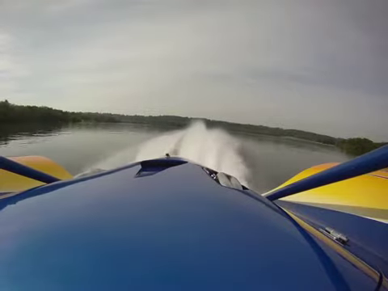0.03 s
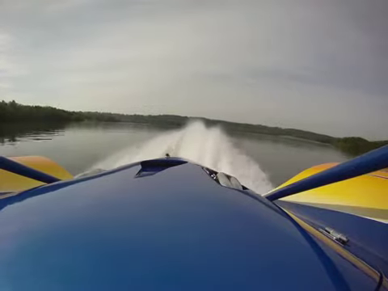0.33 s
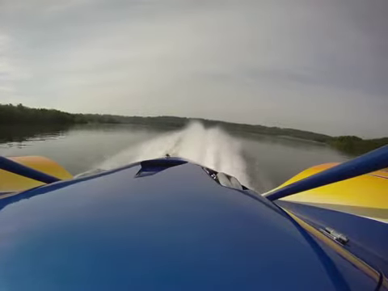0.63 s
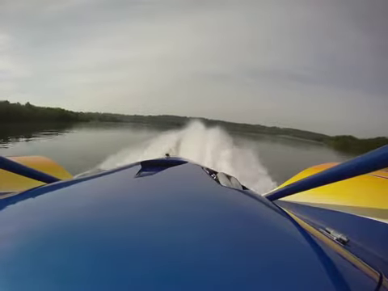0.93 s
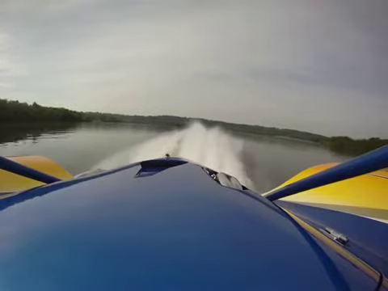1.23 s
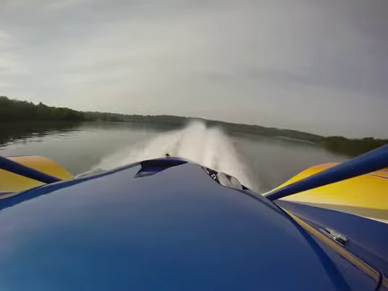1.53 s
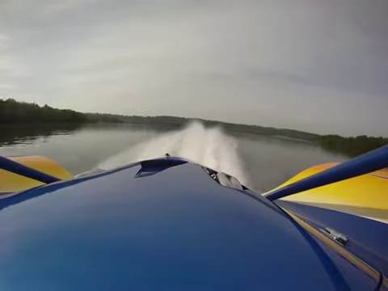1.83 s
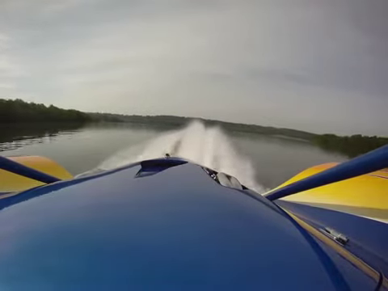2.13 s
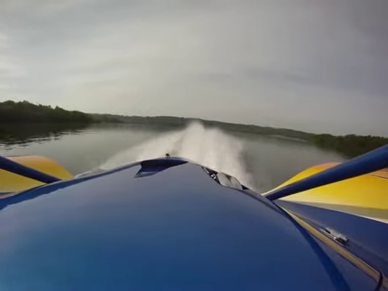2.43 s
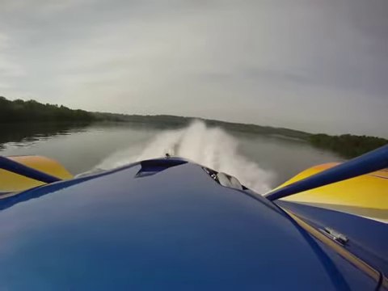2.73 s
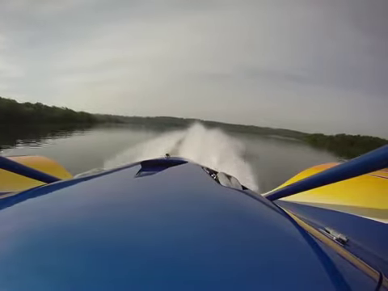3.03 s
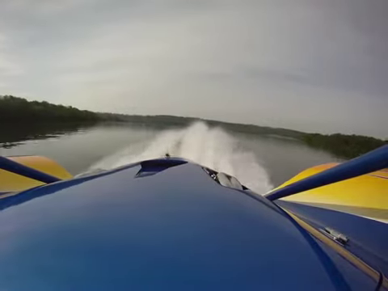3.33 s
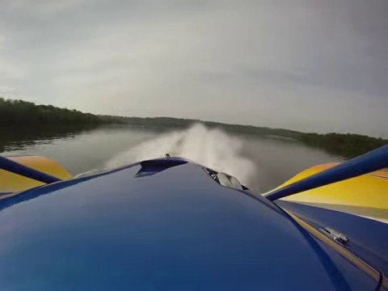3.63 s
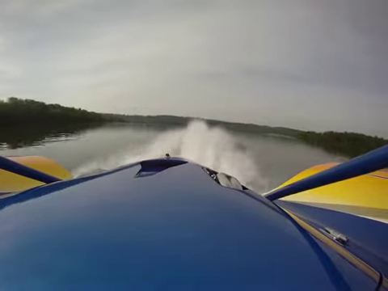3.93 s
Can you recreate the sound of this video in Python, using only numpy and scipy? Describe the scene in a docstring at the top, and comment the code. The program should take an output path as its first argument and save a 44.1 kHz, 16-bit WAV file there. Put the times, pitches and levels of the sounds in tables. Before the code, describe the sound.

A speedboat engine roars flat out for all four seconds, heard from the deck. Its booming, raspy exhaust throbs against the propeller's drone, with a thin fizz on top and brief, irregular cracks. The wake rumbles underneath while the pitch creeps slightly upward. Around 2.5 seconds the engine's tone shifts a little, and low wind gusts swell at about 2.7, 3.5 and 4 seconds.

```python
"""A speedboat runs flat out on calm water, heard from its own deck.
From the start the V8's exhaust booms, rasps and now and then cracks, over a rumble of wake and wind.
The geared four-blade propeller drones just under the engine cycle's sixth order, so the two beat,
and coarse sampling adds a fizz on top. The speed creeps up; near 2.5 s the engine's colour shifts,
and from then to the end the wind swells in three gusts."""
import sys
import numpy as np
from scipy import signal
from scipy.fft import rfft, irfft
from scipy.io import wavfile
from scipy.ndimage import uniform_filter1d

SR = 44100
rng = np.random.default_rng(int(sys.argv[2]) if len(sys.argv) > 2 else 0)


def transcribe(signal):
    """Save signal, clipped to [-1, 1], as a 16-bit WAV file at the path in sys.argv[1]."""
    frames = np.atleast_2d(signal).T
    limited = np.clip(frames, -1, 1)
    pcm = np.round(limited * 32767).astype(np.int16)
    wavfile.write(sys.argv[1], SR, pcm)


N = 176400
T = np.arange(N) / SR

# Spectrum of the wind: frequency_hz, relative_db
WIND_SPECTRUM = [(12, -28), (22, -9), (35, 0), (48, -6), (70, -11), (140, -26), (400, -55), (1500, -90)]
# Gusts of the wind: time_s, level_db
WIND_LEVEL = [(0, -42), (1.1, -39.5), (2.4, -40), (2.72, -33), (3.0, -40), (3.3, -40), (3.45, -33),
              (3.6, -40), (3.85, -38), (4, -34)]
# Spectrum of the wake and hull: frequency_hz, relative_db
WAKE_SPECTRUM = [(25, -34), (60, -21.5), (95, -21), (130, -11.5), (170, -8.5), (210, -2.5), (240, -7),
                 (290, -3), (350, -14.5), (430, -17), (520, -33), (900, -56.5), (2500, -91.5)]
# Exhaust cracks: start_s, relative_db
CRACK_EVENTS = [(0.1461, -12), (0.5851, -16), (0.6589, -15), (0.7801, -15), (0.9014, -20), (1.1583, -14),
                (1.6746, -16), (1.8198, -18), (2.5581, -15), (2.9302, -15), (2.9632, -15), (3.5788, -12),
                (3.6027, -12), (3.7249, -14)]
# Spectrum of a crack: frequency_hz, relative_db
CRACK_SPECTRUM = [(400, -21.5), (700, -13), (1080, 11.5), (1400, -24), (1800, 6.5), (2200, 4), (2480, -2.5),
                  (2620, -28), (2750, -16.5), (3050, -30.5), (3800, -25), (4400, -41), (5600, -31),
                  (6500, -71.5)]
# High harmonics of the engine cycle, either side of the colour shift: order, before_db, after_db
WHINE_ORDERS = [(14, -51, -52), (15, -60, -47), (17, -39, -49), (18, -46, -41), (19, -47, -46),
                (21, -45, -50), (22, -51, -45), (23, -44, -51), (24, -45, -41), (25, -44, -34),
                (26, -43, -40), (27, -44, -48), (28, -49, -38), (31, -48, -53), (33, -52, -55),
                (41, -54, -42), (43, -44, -51), (46, -41, -45), (50, -49, -39), (51, -49, -39),
                (52, -45, -50), (53, -38, -45), (56, -44, -50), (66, -49, -57)]
# Each cylinder's burst, in firing order: relative_db
CYLINDER_BURSTS = [-0.5, 5.5, -2.7, -3.5, -16, -1, -3, 0.4]
# Spectrum of the exhaust gas noise: frequency_hz, relative_db
RASP_SPECTRUM = [(300, -8.5), (450, -12.5), (540, -14), (660, -9), (740, -4), (850, -4.5), (1080, 1.5),
                 (1200, 0), (1300, -10.5), (1420, -10), (1630, -6.5), (1760, -3.5), (2020, -3), (2170, 1.5),
                 (2460, -3), (2540, -11.5), (2610, -28), (2720, -5), (2830, -14), (3000, -21), (3250, -19),
                 (3480, -26.5), (3740, -17.5), (3920, -24), (4020, -21.5), (4300, -33.5), (5100, -31.5),
                 (5600, -36.5), (6000, -42.5), (7000, -57.5)]
# Course of the rasp's level: time_s, level_db
RASP_ENVELOPE = [(0, -32), (.7, -30), (1.4, -31.5), (1.7, -29), (2.2, -32.5), (2.6, -29), (3.1, -30.5),
                 (3.6, -30.5), (4, -29.5)]
# Harmonics of the propeller shaft's rotation: order, level_db
SHAFT_ORDERS = [(1, -40), (2, -40.5), (3, -26.5), (4, -16)]
# Low harmonics of the engine cycle, either side of the colour shift: order, before_db, after_db
BOOM_ORDERS = [(1, -60, -56.5), (2, -30, -29), (3, -41, -41), (4, -37, -36), (5, -20, -22.5),
               (6, -18.5, -20), (7, -31, -25), (8, -27.5, -25), (9, -33, -43), (10, -37.5, -34.5),
               (11, -51, -56.5), (12, -53, -55.5)]
# Engine speed, at two crank turns a cycle: time_s, cycle_rate_hz
ENGINE_SPEED = [(0.0, 40.573), (0.25, 41.013), (0.5, 40.769), (0.75, 41.378), (1.0, 41.229), (1.25, 41.188),
                (1.5, 41.613), (1.75, 41.493), (2.0, 41.911), (2.25, 41.761), (2.5, 42.042), (2.75, 42.335),
                (3.0, 41.836), (3.25, 42.661), (3.5, 42.022), (3.75, 42.539), (4.0, 42.794)]


def from_db(db):
    """Amplitude grows tenfold for every 20 dB."""
    return 10 ** (np.asarray(db) / 20)


def unit_rms(x):
    """Division by the root mean square gives unit power."""
    return x / np.sqrt(np.mean(x ** 2) + 1e-20)


def in_time(rows):
    """Linear interpolation gives a control value at every sample."""
    return np.interp(T, *np.transpose(rows))


def drift(corner_hz):
    """Low-pass filtered noise is a slow random fluctuation, here of unit rms."""
    hz = np.arange(N + 1) * SR / (2 * N)
    noise_spectrum = rfft(rng.standard_normal(2 * N))
    return unit_rms(irfft(noise_spectrum / (1 + (hz / corner_hz) ** 2))[:N])


def minimum_phase(db):
    """Causality: a body rings only once struck; the Hilbert transform of log gain sets its phase."""
    log_gain = np.r_[db, db[-2:0:-1]] * np.log(10) / 20
    return np.exp(np.conj(signal.hilbert(log_gain)))[:len(db)]


def colour(x, spectrum):
    """Linear filtering multiplies a sound's spectrum by a body's response; white noise keeps its power."""
    hz, db = np.transpose(spectrum)
    grid_hz = np.arange(N + 1) * SR / (2 * N)
    response = minimum_phase(np.interp(np.log(grid_hz + 1), np.log(hz), db))
    response /= np.sqrt(np.mean(abs(response) ** 2))
    return irfft(rfft(x, 2 * N) * response)[:N]


def colour_shift(before_db, after_db, centre_s=2.54, length_s=.25):
    """Timbre follows the balance of harmonics: one order's level ramps to a new value."""
    progress = np.clip((T - centre_s) / length_s + .5, 0, 1)
    return before_db + progress * (after_db - before_db)


def wind():
    """Turbulent pressure makes a low buffeting that swells in gusts."""
    return colour(rng.standard_normal(N), WIND_SPECTRUM) * from_db(in_time(WIND_LEVEL))


def wake(level_db=-27, waver_db=.3):
    """Churned water is a broadband source, filtered to a rumble by the hull."""
    return colour(rng.standard_normal(N), WAKE_SPECTRUM) * from_db(level_db - waver_db * drift(21))


def exhaust_cracks(decay_s=.002, spit_db=-2.5, snap_db=9.5):
    """Impulse excitation: a snap and a short spit of gas set the exhaust's resonances ringing."""
    gas = rng.choice([-1, 1], N)
    bursts = np.zeros(N)
    for start_s, db in CRACK_EVENTS:
        envelope = (T >= start_s) * np.exp(-abs(T - start_s) / decay_s)
        bursts += from_db(db + spit_db) * gas * envelope
        bursts[int(start_s * SR)] += from_db(db + snap_db)
    return colour(bursts, CRACK_SPECTRUM)


def engine_whine(cycles, waver_db=2, wander_cycles=.001):
    """High harmonics of the engine cycle stand out as tones, each wavering in level."""
    wandering = cycles + wander_cycles * drift(2.2)
    whine = np.zeros(N)
    for order, before_db, after_db in WHINE_ORDERS:
        gain = from_db(colour_shift(before_db, after_db) + waver_db * drift(1.33))
        whine += gain * np.sin(2 * np.pi * (order * wandering + rng.random()))
    return whine


def firing_envelope(cycles, lag=.34, jitter=.12, decay=.45, scatter_db=1):
    """Each cylinder's burst decays exponentially; lag, jitter and decay are in firing intervals."""
    cylinders = len(CYLINDER_BURSTS)
    firings = cycles * cylinders
    index = np.arange(-cylinders, int(firings[-1]) + cylinders)
    early_or_late, weakening = rng.standard_normal((len(index), 2)).T
    starts = np.sort(index + lag + jitter * early_or_late)
    strength = from_db(np.array(CYLINDER_BURSTS)[index % cylinders] - scatter_db * weakening)
    latest = np.searchsorted(starts, firings) - 1
    return strength[latest] * np.exp(-(firings - starts[latest]) / decay)


def exhaust_rasp(cycles, steady_flow=.64, repeating_share=.42, waver_db=.9):
    """Amplitude modulation: the firings pulse gas noise that partly repeats from cycle to cycle."""
    flow = firing_envelope(cycles) + steady_flow
    orders = np.exp(2j * np.pi * rng.random(size=513))
    orders[[order for order, _, _ in WHINE_ORDERS]] = 0  # these orders sound as the whine
    one_cycle = irfft(orders)
    position = np.arange(len(one_cycle)) / len(one_cycle)
    repeating = unit_rms(np.interp(cycles, position, one_cycle, period=1))
    gas = np.sqrt(repeating_share) * repeating + np.sqrt(1 - repeating_share) * rng.standard_normal(N)
    gain = from_db(in_time(RASP_ENVELOPE) + waver_db * drift(2.1))
    return gain * unit_rms(colour(flow * gas, RASP_SPECTRUM))


def throb(drone, depth_db=.93, lead_s=.018):
    """Close frequencies beat: this gain rises just ahead of each beat of engine and propeller."""
    envelope = uniform_filter1d(abs(signal.hilbert(drone)), size=900)
    beats = unit_rms(envelope - envelope.mean())
    return from_db(depth_db * np.interp(T + lead_s, T, beats))


def propeller(cycles, turns_per_cycle=33 / 23, first_blade_s=.01, waver_db=1.4):
    """Blade passage sounds the shaft's fourth order; one blade biting harder adds the lower three."""
    turns = turns_per_cycle * (cycles - np.interp(first_blade_s, T, cycles))
    drone = sum(from_db(db) * np.cos(2 * np.pi * order * turns) for order, db in SHAFT_ORDERS)
    return drone * from_db(waver_db * drift(3.8))


def exhaust_boom(cycles):
    """Forced resonance: uneven firing thumps the pipes once a cycle, and they ring in the low orders."""
    _, before, after = np.transpose(BOOM_ORDERS)
    mean_db = (before + after) / 2
    phase = np.angle(minimum_phase(np.pad(mean_db, (1, 20), mode="edge")))
    boom = np.zeros(N)
    for order, before_db, after_db in BOOM_ORDERS:
        gain = from_db(colour_shift(before_db, after_db))
        boom += gain * np.cos(2 * np.pi * order * cycles + phase[order])
    return boom


def scene():
    """Superposition: exhaust and propeller, driven at one engine speed, add to wake and wind."""
    cycles = np.cumsum(in_time(ENGINE_SPEED)) / SR
    drone = exhaust_boom(cycles) + propeller(cycles)
    snarl = throb(drone) * (engine_whine(cycles) + exhaust_rasp(cycles))
    return (drone + snarl + exhaust_cracks() + wake() + wind())[None]


def record(dry):
    """Spectral imaging: sample-and-hold steps mirror the sound about the hold rate; the top is cut."""
    hold_hz, fizz_db, cutoff_hz = 12000, 1, 14900
    slope = np.gradient(dry, axis=-1) * SR
    images = slope / (np.pi * hold_hz) * np.sin(2 * np.pi * hold_hz * T)
    fizz = signal.lfilter([1, 1], [2 * np.cos(np.pi * hold_hz / SR)], images)  # weaker toward the top
    low_pass = signal.ellip(10, .1, 90, cutoff_hz, fs=SR, output="sos")
    return signal.sosfilt(low_pass, dry + from_db(fizz_db) * fizz)


dry = scene()
out = record(dry)
transcribe(out)
```